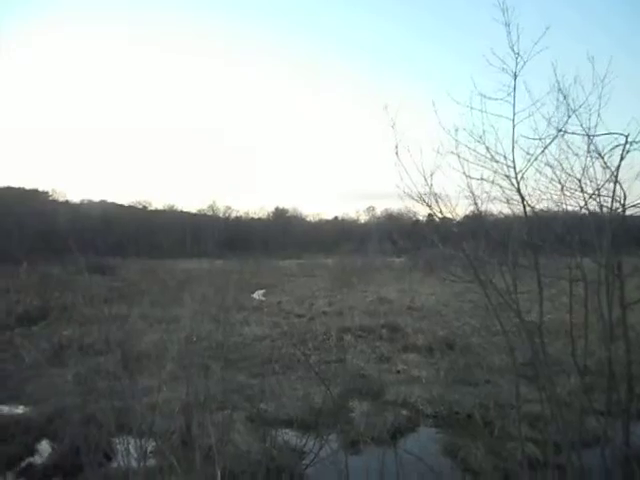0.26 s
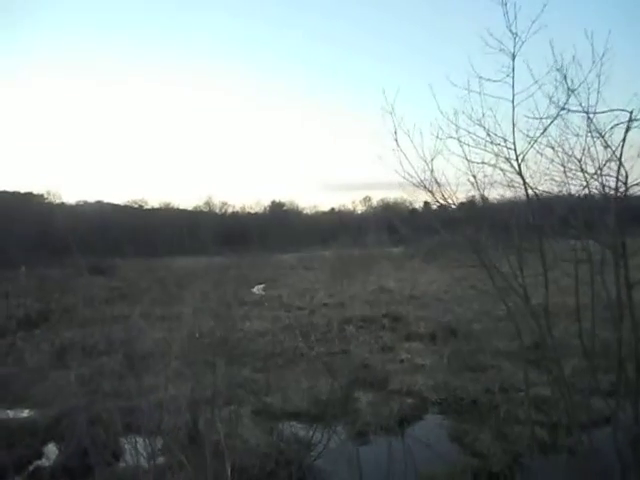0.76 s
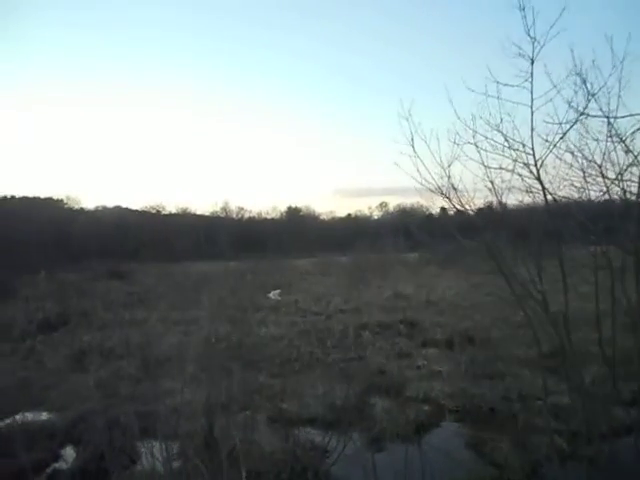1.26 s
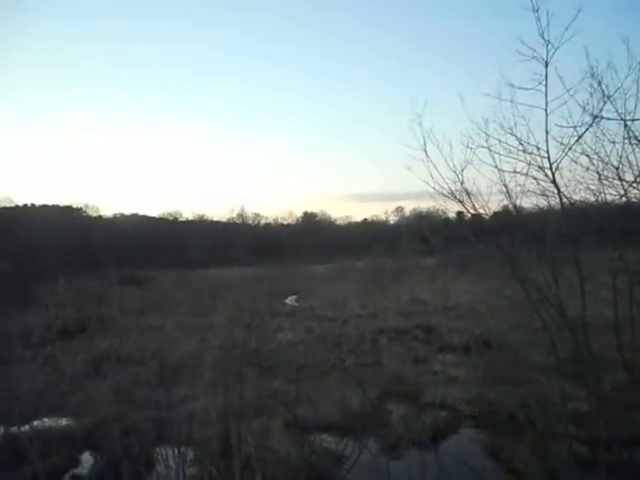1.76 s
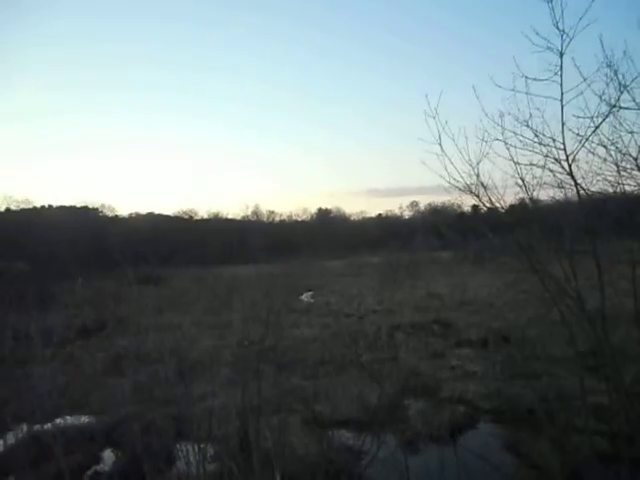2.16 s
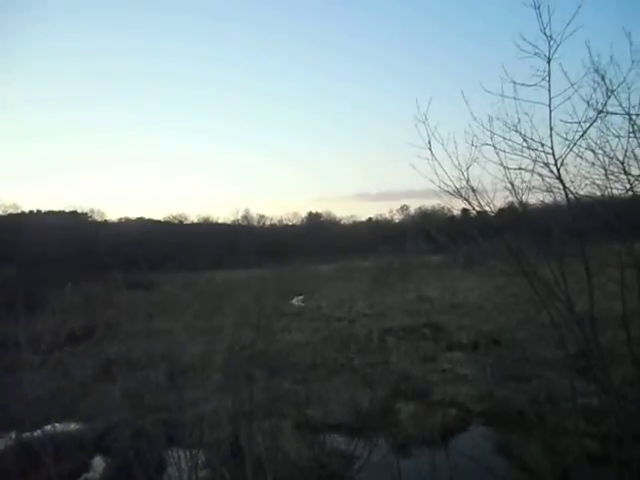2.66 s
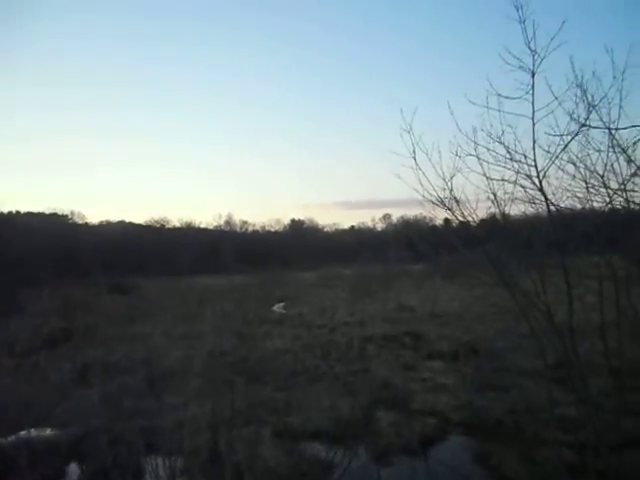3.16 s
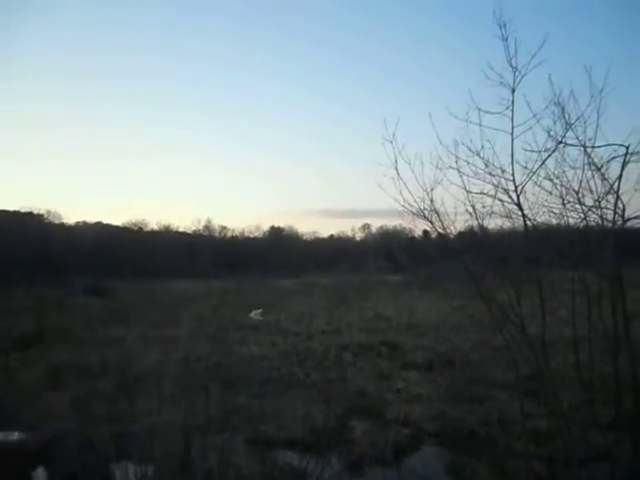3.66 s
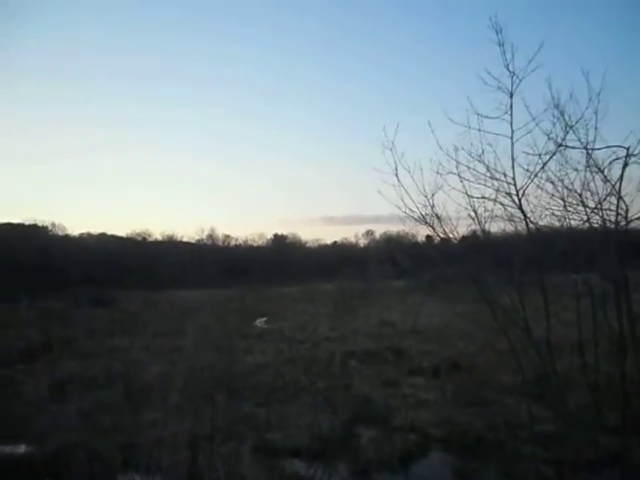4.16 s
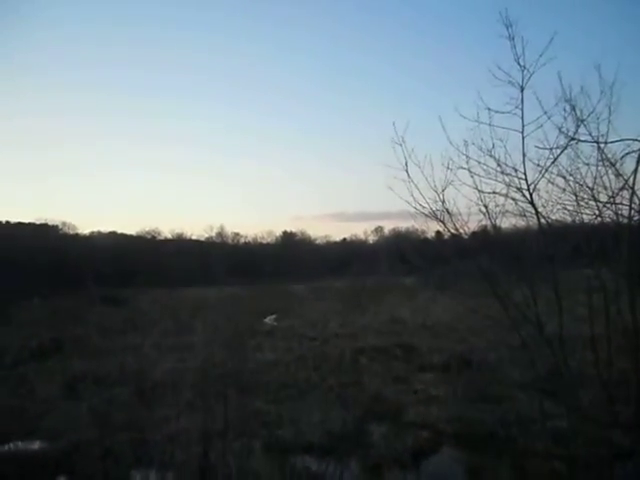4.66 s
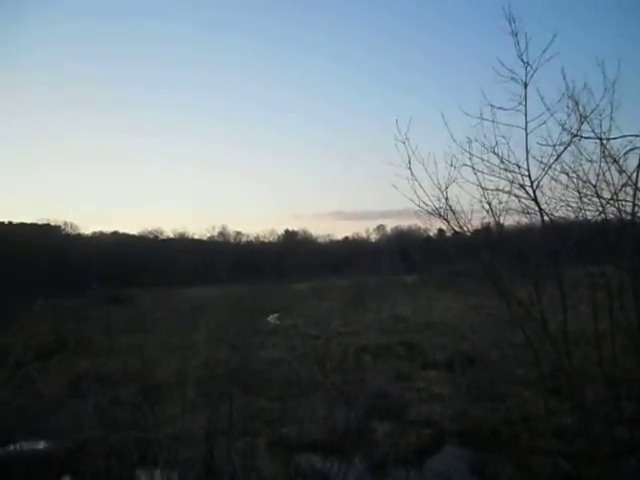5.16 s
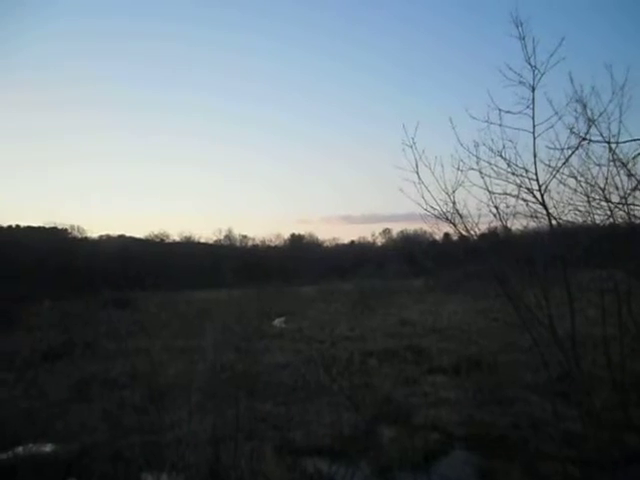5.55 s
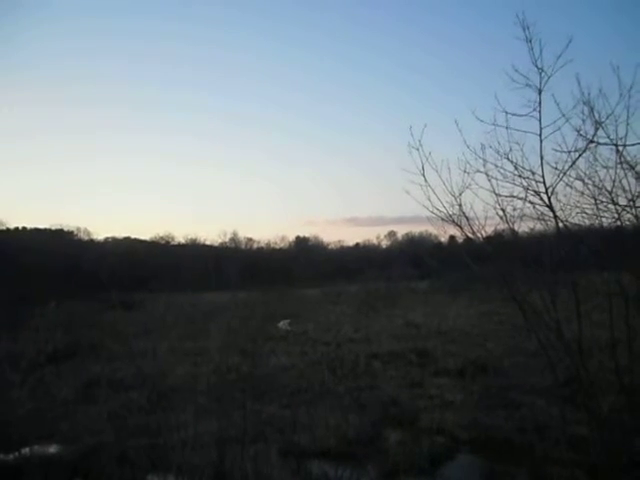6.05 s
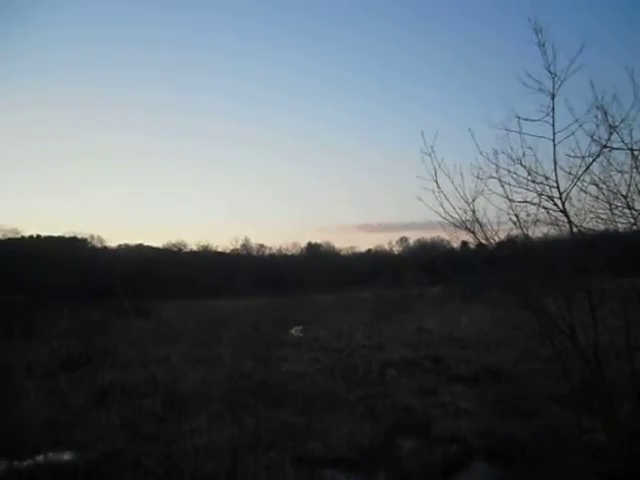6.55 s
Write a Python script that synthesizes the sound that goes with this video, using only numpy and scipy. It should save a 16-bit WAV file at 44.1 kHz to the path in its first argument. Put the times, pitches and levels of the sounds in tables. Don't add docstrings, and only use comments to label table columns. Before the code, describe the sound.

A brief near-silence ends at 0.03 s with a switch-on click and low sag. The marsh starts very quiet and swells over the first two seconds as the automatic gain opens. Dozens of small frogs whistle brief, nearly pure peeps sliding upward around 2.5 to 3.4 kHz, close voices crisp over a continuous blurred far chorus, soft low croaks, hiss, distant hum and a faint steady high whine. Wind buffets the microphone in low lumps, with gusts near 1.4 s and 2.7 s. A few tiny high chips occur near 2 s. From about 2.6 to 3.25 s dry reeds crackle, then at 3.26 s a twig snaps, extremely sharp and dry. The level drops at once, stays low about half a second and creeps back. Wind thumps strongly near 3.9, 4.4 and 4.95 s, then eases, while overlapping peeps continue to the cut at nearly 7 s.

```python
import sys
import numpy as np
from scipy import signal
from scipy.fft import rfft, irfft, next_fast_len
from scipy.io import wavfile
from scipy.ndimage import uniform_filter1d, map_coordinates

SR = 44100
rng = np.random.default_rng(int(sys.argv[2]) if len(sys.argv) > 2 else 0)


def int16_out(signal):
    q = np.round(np.clip(np.atleast_2d(signal).T, -1, 1) * 32767)
    wavfile.write(sys.argv[1], SR, q.astype(np.int16))


def rack_gain(trim_db):
    fader = np.asarray(trim_db, float)
    return 10 ** (fader / 20)


N = 299880
T = np.arange(N) / SR
START_S = .0295



def unit(x):
    return x / np.sqrt(np.mean(x ** 2) + 1e-20)


def curves(rows):
    s, *cols = np.transpose(rows)
    return [np.interp(T, s, c) for c in cols]


def wobble(rate_hz):
    knots = rng.standard_normal(int(N * rate_hz / SR) + 4)
    return map_coordinates(knots, [T * rate_hz])


def filtered(x, response):
    m = next_fast_len(N + 8192)
    spectrum = rfft(x, m) * response(np.fft.rfftfreq(m, 1 / SR))
    return irfft(spectrum, m)[:N]


def colour(points):
    f, db = np.transpose(points)
    return lambda hz: rack_gain(np.interp(np.log(hz + 1), np.log(f), db, -120, -120))


def rush(spectrum):
    return unit(filtered(rng.standard_normal(N), colour(spectrum)))


def add(track, s, sound):
    part = track[round(s * SR):][:len(sound)]
    part += sound[:len(part)]


def whistles(rows, bend, waver_db):
    out = np.zeros(N)
    for (s, length, start_hz, end_hz, db), turn in zip(rows, rng.random(len(rows))):
        u = np.linspace(0, 1, round(length * SR))
        hz = start_hz + (end_hz - start_hz) * (u + bend * u * (1 - u))
        fade_in, fade_out = np.clip(u / .25, 0, 1), np.clip((1 - u) / .1, 0, 1)
        swell = fade_in * fade_out * rack_gain(4 * (u - .6))
        waver = rack_gain(waver_db * np.sin(2 * np.pi * (turn + 34 * length * u)))
        tone = np.sin(2 * np.pi * (turn + np.cumsum(hz) / SR))
        add(out, s, rack_gain(db) * swell * waver * tone)
    return out


def crowd(count, centre_hz, spread, rise, length, scatter_db):
    even = rng.random((count, 2))
    bell = np.clip(rng.standard_normal((count, 2)), -2.3, 2.3)
    start_s = even[:, 0] * N / SR
    length_s = length * (.7 + .6 * even[:, 1])
    hz = centre_hz * np.exp(spread * bell[:, 0])
    return np.c_[start_s, length_s, hz * (1 - rise / 2), hz * (1 + rise / 2), scatter_db * bell[:, 1]]


def marsh(x, t60):
    t = T[:SR // 2]
    tail = rng.standard_normal(len(t)) * rack_gain(-60 * t / t60)
    return signal.fftconvolve(x, tail / np.linalg.norm(tail))[:N]


def switch_on_jolt():
    t = np.clip(T - START_S, 0, None)
    return -rack_gain(-29.5) * np.exp(-t / 0.00056) - rack_gain(-44.5) * np.exp(-t / 0.18)


# pitch_hz, level_db
WHINE = [(7852, -11), (7882, -17)]


def electronic_whine():
    return sum(rack_gain(db + 1.5 * wobble(4)) * np.sin(2 * np.pi * hz * T) for hz, db in WHINE)


# start_s, cut_db
DUCKS = [
    (-1 / 100, -23.5),
    (3.267, -10),
]


def gain_control():
    open_db, hold_s, recover_s, cut_s = -49.5, 0.57, 0.88, .007
    out = np.ones(N)
    for s, db in DUCKS:
        creep = np.exp(-np.clip(T - s - hold_s, 0, None) / recover_s)
        out = np.where(T < s, out, 1 - (1 - rack_gain(db)) * creep)
    return rack_gain(open_db) * uniform_filter1d(out, size=round(cut_s * SR))


# pitch_hz, level_db (per Hz)
AIR = [(90, -18), (150, -13), (270, -5.5), (440, -10.5), (770, -5.5), (1150, -10), (1500, -15.5),
       (2250, -16.5), (3500, -18.5), (6000, -21), (13000, -23)]


def air():
    return rack_gain(11) * unit(rack_gain(.4 * wobble(6)) * rush(AIR))


# time_s, level_db
WIND = [(0, 12.5), (1.2, 14), (1.6, 14), (2.4, 11.5), (3.3, 17.5), (3.7, 16), (4.3, 15), (4.9, 12),
        (5.35, 10), (5.7, 10), (6.4, 3.5), (6.8, 7)]
# peak_s, swell_s, level_db, extra_raggedness_db
GUSTS = [(.75, .08, 3.5, 0), (1.4, 0.14, 13.5, 1.5), (1.69, 0.082, 5.5, -1), (1.83, 0.048, 5.5, 8.5),
         (1.99, 0.13, 5, -3), (2.68, 0.13, 8.5, 3), (3.02, .24, 6.5, 10), (3.43, 0.082, 2, 10),
         (3.33, .05, 3, 8), (3.54, 0.076, 3, 7), (3.9, 0.077, 6, 2), (4.12, 0.11, 11.5, 3.5),
         (4.37, .1, 9, 5.5), (4.57, 0.075, 0.5, 9), (4.72, 0.22, 8, -9), (4.95, 0.064, 5, 0.1),
         (5.51, 0.085, 8, -3), (6.05, 0.14, 5.5, -2)]


def gusts():
    s, swell, db, ragged_db = np.transpose(GUSTS)
    shape = np.clip(1 - np.abs(T[:, None] - s) / swell, 0, 1)
    return curves(WIND)[0] + shape @ db, shape @ ragged_db


# pitch_hz, level_db (per Hz)
RUMBLE = [(8, -7), (22, 1.5), (36, 0), (60, -7), (90, -9.5), (200, -60)]
# pitch_hz, level_db (per Hz)
FLUTTER = [(30, -40), (70, -7), (120, -1.5), (180, -11), (300, -22), (600, -36)]


def wind():
    rumble_db, ragged_db = gusts()
    flutter_db = 1.17 * rumble_db + ragged_db - 11.5
    rumble = rack_gain(rumble_db + 1.4) * unit(rack_gain(2.4 * wobble(8.6)) * rush(RUMBLE))
    flutter = rack_gain(flutter_db - 1.0) * unit(rack_gain(4.2 * wobble(28)) * rush(FLUTTER))
    return rumble + flutter


# time_s, far_peeps_db, croaks_db
CHORUS = [(0, 13, 5), (.7, 14, 3.5), (1.4, 12, 4), (2.1, 15, 6), (2.8, 14, 7), (3.5, 16.5, 5.5),
          (4.2, 15.5, 7), (4.9, 14.5, 1), (5.6, 16, 1.5), (6.2, 14, 4), (6.8, 12.5, 4)]


def far_chorus():
    far_db, croak_db = curves(CHORUS)
    callers = crowd(count=1500, centre_hz=2925, spread=.037, rise=.075, length=.11, scatter_db=1.4)
    far = whistles(callers, bend=.3, waver_db=1.5)
    croakers = crowd(count=1800, centre_hz=770, spread=.1, rise=.05, length=.032, scatter_db=2.2)
    croaks = whistles(croakers, bend=.1, waver_db=1.1)
    far = rack_gain(far_db - 2.5) * unit(far + .7 * marsh(far, t60=.3))
    croaks = rack_gain(croak_db) * unit(croaks + 0.46 * marsh(croaks, t60=0.5))
    return far + croaks


def peeps(rows):
    lead_s = .01
    s, length, hz, db = np.transpose(rows)
    length = length + 2 * lead_s
    rise = 2 * (hz - 1800) * length
    return np.c_[s - lead_s, length, hz - .54 * rise, hz + .46 * rise, db]


# start_s, length_s, middle_pitch_hz, level_db
LARGE_FROGS = [(.215, .16, 2480, 3), (.22, .11, 2600, 2), (.505, .08, 2580, 0), (.53, .08, 2740, 12),
               (1.24, .09, 2360, 1), (1.289, .08, 2720, 14), (1.445, .08, 2640, 7), (1.71, .15, 2680, 9),
               (2.1, .06, 2715, 9), (2.355, .16, 2800, 13), (2.38, .15, 2375, -2), (2.56, .08, 2620, 2),
               (2.653, .08, 2660, 5), (2.835, .12, 2750, 14), (3.048, .17, 2780, 12), (3.187, .17, 2640, 9),
               (3.41, .115, 2400, 0), (3.965, .08, 2320, -2), (4.08, .19, 2535, 1.5), (4.34, .1, 2435, -1),
               (4.63, .07, 2745, 9), (4.905, .185, 2590, 6), (5.33, .11, 2420, 4), (5.622, .09, 2750, 12),
               (5.767, .2, 2580, 4), (5.85, .08, 2400, -1), (5.93, .145, 2500, 4), (6.203, .17, 2380, 0),
               (6.47, .08, 2680, 7)]
# start_s, length_s, middle_pitch_hz, level_db
HIGHER_FROGS = [(.28, .17, 2860, 11), (.71, .12, 2970, 12), (.755, .165, 2875, 11), (.92, .165, 2960, 12),
                (1.17, .08, 2980, 13), (1.3, .08, 2920, 15), (1.305, .1, 2995, 13), (1.467, .07, 2960, 14),
                (1.74, .115, 2900, 13), (1.79, .07, 3030, 15), (2.23, .13, 3000, 13), (2.38, .13, 2930, 13),
                (2.555, .14, 2950, 12), (3.553, .13, 2885, 11), (4.147, .165, 3020, 14),
                (4.243, .095, 2920, 13), (4.351, .1, 3040, 12), (4.5, .1, 2900, 13), (5.0, .075, 3045, 15),
                (5.367, .165, 3045, 12), (6.0, .06, 2875, 13), (6.275, .1, 2960, 12), (6.73, .07, 3000, 14),
                (0.203, 0.08, 2920, 15.1), (1.1, 0.08, 3020, 15.4), (1.585, 0.17, 2880, 12.9),
               (1.779, 0.08, 3260, 3.4), (1.968, 0.11, 3380, 4.3), (2.4, 0.11, 3020, 16.2),
               (2.937, 0.17, 2980, 13.3), (3.082, 0.11, 2940, 14.2), (3.419, 0.08, 2860, 15.6),
               (3.428, 0.14, 3100, 15.4), (3.788, 0.11, 2920, 14.9), (3.93, 0.08, 3380, 4.1),
               (4.066, 0.2, 2880, 14.9), (4.412, 0.08, 3140, 10.0), (4.638, 0.08, 3180, 10.0),
               (4.798, 0.08, 3360, 7.1), (4.888, 0.08, 3080, 17.4), (5.027, 0.11, 3180, 13.2),
               (5.236, 0.08, 3140, 11.6), (5.448, 0.08, 3060, 14.0), (5.648, 0.08, 3220, 7.5),
               (5.715, 0.11, 3060, 17.8), (5.976, 0.08, 3340, 1.5), (6.06, 0.08, 3220, 5.6),
               (6.066, 0.14, 2980, 13.2), (6.072, 0.11, 3180, 10.9), (6.206, 0.11, 3120, 11.5),
               (6.322, 0.08, 3080, 12.7), (6.412, 0.17, 2960, 12.4), (6.713, 0.08, 3220, 10.3)]


def near_frogs():
    near = whistles(peeps(LARGE_FROGS + HIGHER_FROGS), bend=.15, waver_db=2.2)
    callers = crowd(count=130, centre_hz=2960, spread=.02, rise=.07, length=.11, scatter_db=1.5)
    others = whistles(callers, bend=.15, waver_db=3)
    callers = crowd(count=45, centre_hz=2570, spread=.035, rise=.07, length=.11, scatter_db=2)
    deep = whistles(callers, bend=.15, waver_db=3)
    return rack_gain(-.5) * near + rack_gain(5.5) * others + rack_gain(-5) * deep


def frogs():
    near = near_frogs()
    return near + far_chorus() + rack_gain(-7.5) * marsh(near, t60=.25)


# centre_s, pitch_hz, length_cycles, level_db
THUMPS = [(0.762, 69.4, 1.1, 32.5), (1.035, 300, 0.92, 26), (1.373, 69.6, 1.5, 30), (1.424, 110, 0.75, 31),
          (1.836, 107, 2.6, 29), (1.985, 40, 0.82, 28.5), (2.151, 241, 1.9, 24), (2.635, 145, 4, 24.5),
          (2.676, 59, 0.68, 35.5), (2.839, 89, 1.4, 28), (2.951, 86.5, 1.2, 34.5), (3.036, 60, 0.96, 34.5),
          (3.07, 145, 2, 32), (3.101, 160, 1.4, 31.5), (3.141, 133, 3.1, 28), (3.44, 111, 1.8, 33.5),
          (3.89, 82.6, 0.63, 38), (4.125, 92, 1.5, 33.5), (4.361, 100, 0.84, 38), (4.396, 79.5, 1.4, 32),
          (4.56, 132, 1.6, 25.5), (4.9516, 128, 2, 38), (4.967, 50, 1.2, 35), (4.9572, 540, 2.25, 30.5),
          (4.952, 280, 1.8, 29.5), (5.159, 78.5, 1.1, 24.5), (5.506, 100, 1.06, 28),
          (5.621, 44.2, 0.85, 27.5), (6.775, 50, 1.1, 25)]


def eddies():
    out = np.zeros(N)
    t = np.arange(-SR // 20, SR // 20) / SR
    for s, hz, cycles, db in THUMPS:
        bump = np.exp(-(2 * t * hz / cycles) ** 2)
        add(out, s - 1 / 20, rack_gain(db) * bump * np.sin(2 * np.pi * hz * t))
    return out


# start_s, length_s, start_pitch_hz, end_pitch_hz, level_db
TICKS = [
    (1.92, .03, 2300, 2150, 3),
    (1.955, .035, 2150, 1950, 0),
    (2.083, .018, 5080, 5120, 9),
    (4.755, .065, 3060, 3280, 5),
    (2.64, .03, 5230, 5270, -2),
    (4.83, .055, 3420, 3500, 4),
    (3.96, .045, 3430, 3500, 2),
    (2.5, .065, 3550, 3595, 2),
    (2.02, .055, 3480, 3540, 3),
]


def strays():
    return whistles(TICKS, bend=.2, waver_db=1.5)


# time_s, level_db
REEDS = [
    (2.45, -30),
    (2.7, 1.5),
    (2.9, 2.5),
    (3.1, 3),
    (3.22, -1),
    (3.3, -28),
]
# pitch_hz, level_db (per Hz)
RUSTLE = [(2800, -25), (3400, -2), (3650, 5), (4100, -4), (4800, -4), (6000, -25), (9000, -27),
          (12000, -36)]


def reeds():
    return rack_gain(curves(REEDS)[0]) * unit(rack_gain(1.8 * wobble(90)) * rush(RUSTLE))


# start_s, level_db, t60_s, ring_pitch_hz
SNAP = [
    (3.2563, 37, .02, 7800),
    (3.2568, 38, .017, 3750),
    (3.2604, 50.3, .0065, 7950),
    (3.2606, 42, .01, 2700),
    (3.2618, 40, .019, 5350),
    (3.2625, 35, .03, 1200),
    (3.2635, 32, .012, 3900),
    (3.2715, 29, .022, 7500),
    (3.272, 26, .03, 1200),
]
# pitch_hz, level_db (per Hz)
TWIG = [(600, -4), (1200, -18), (2000, -6), (4000, -2.5), (6000, -10), (8500, -7.5), (12000, -8.5)]


def twig():
    out, crackle, t = np.zeros(N), rush(TWIG), T[:SR // 20]
    for s, db, t60, hz in SNAP:
        dry = rack_gain(-7.5) * crackle[round(s * SR):][:len(t)]
        decay = rack_gain(db - 4.5 - 60 * t / t60)
        add(out, s, decay * (np.sin(2 * np.pi * hz * t) + dry))
    return out


def scene():
    return (frogs() + wind() + reeds() + eddies() + strays() + twig() + air())[None]


# pitch_hz, level_db
MIC = [(20, 0), (9900, 0), (10500, -7), (11000, -17), (11600, -18), (12000, -24), (12380, -34),
       (12450, -70), (22000, -90)]


def treble_limit(x):
    return filtered(x, lambda hz: np.where(hz < 20, 1, colour(MIC)(hz)))


def roll_off(x):
    return signal.sosfilt(signal.butter(12, 16660, fs=SR, output="sos"), x)


def record(dry):
    live = (dry[0] + electronic_whine()) * gain_control() + switch_on_jolt()
    live = np.where(T < START_S, .0015, live)
    out = treble_limit(live)
    out = out / (1 + np.abs(out / .74) ** 30) ** (1 / 30)
    return roll_off(out[None])


dry = scene()
out = record(dry)
int16_out(out)
```